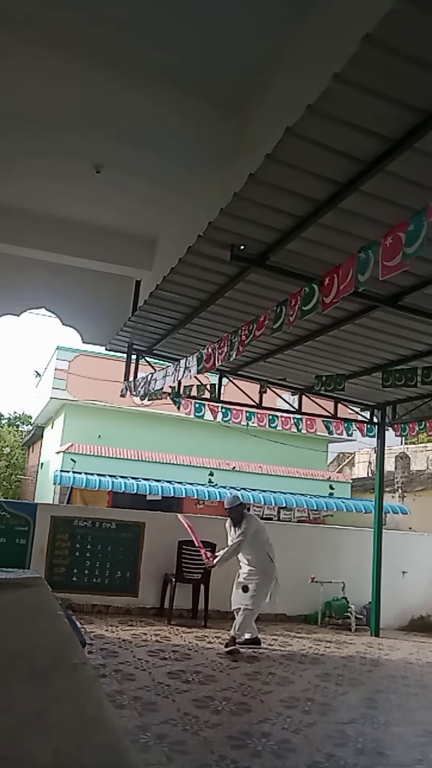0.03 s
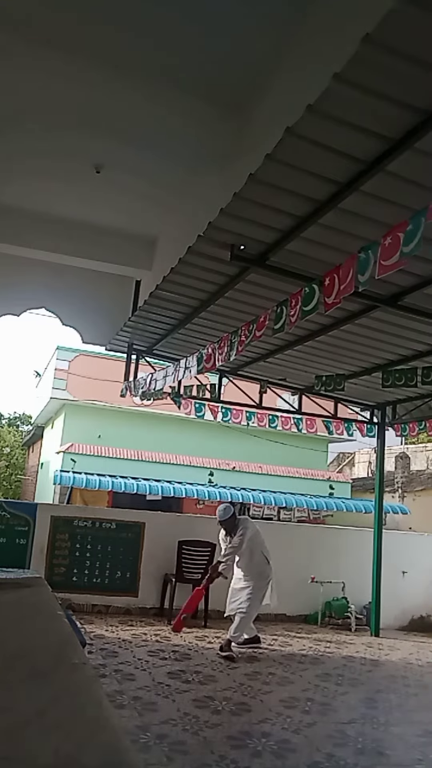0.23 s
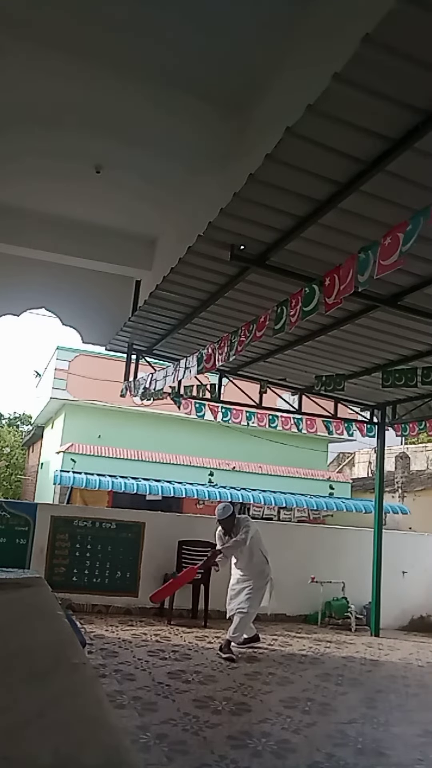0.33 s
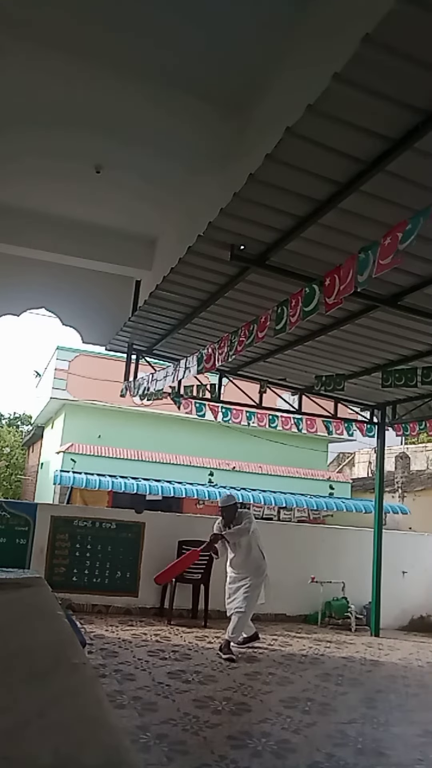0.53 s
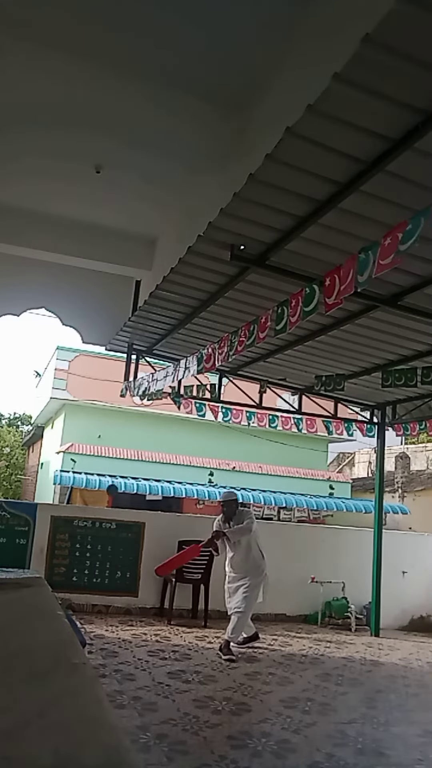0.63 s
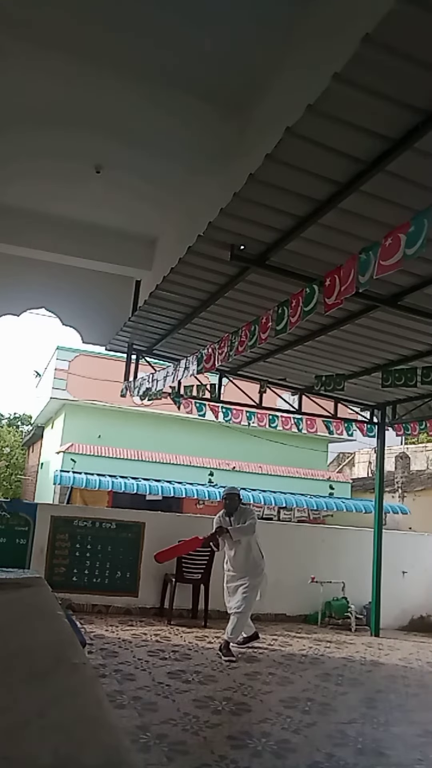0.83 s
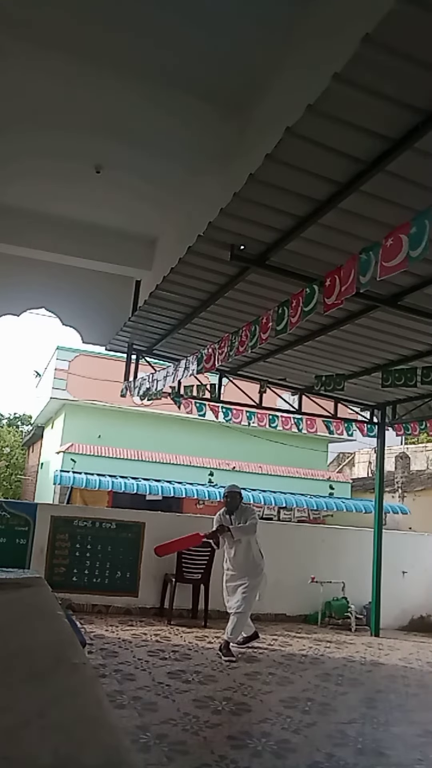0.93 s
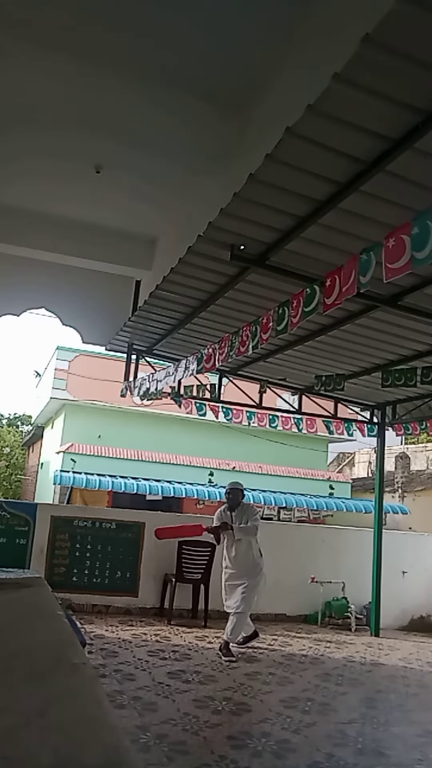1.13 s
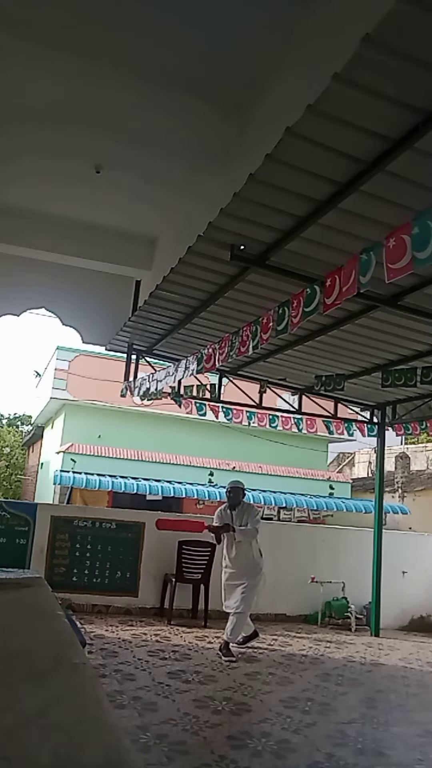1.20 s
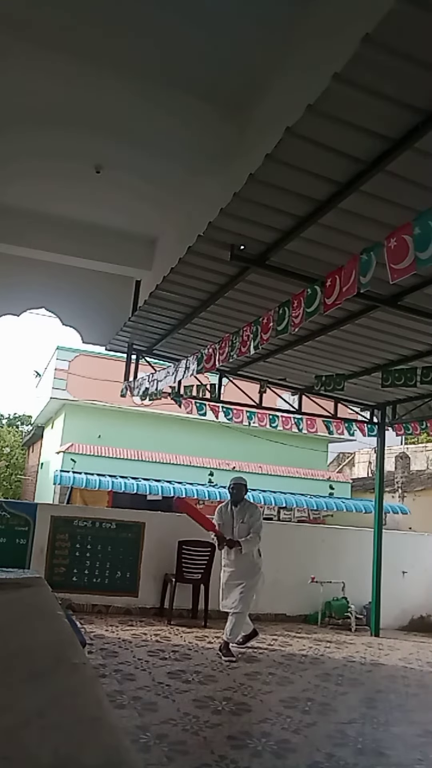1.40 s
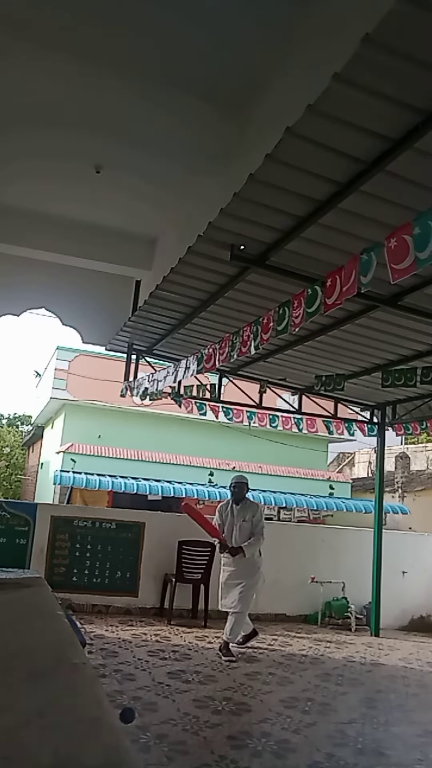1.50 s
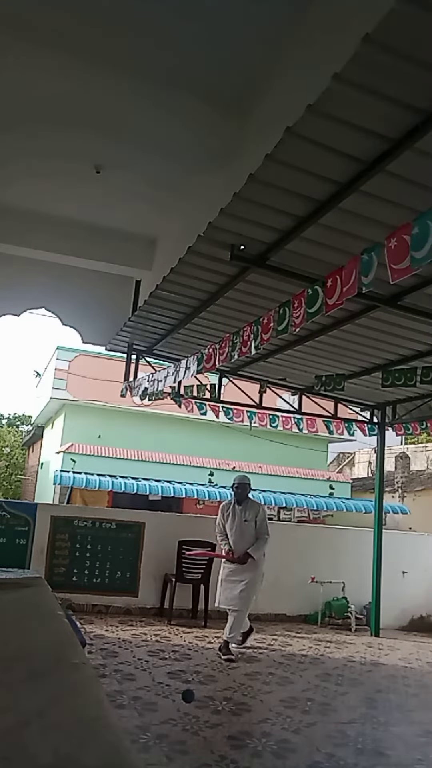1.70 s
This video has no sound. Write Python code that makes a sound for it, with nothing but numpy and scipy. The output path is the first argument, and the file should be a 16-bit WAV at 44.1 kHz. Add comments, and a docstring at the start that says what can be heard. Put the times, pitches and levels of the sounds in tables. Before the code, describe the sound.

A cricket bat hits a hollow ball with one sharp crack that echoes under the roof of a tiled yard. The ball then bounces softly twice, the second time duller, over a faint background rumble.

```python
"""A bat cracks against a hollow ball under the sheet roof of a tiled, walled yard.
Contact and bat ring as damped modes; the crack slaps off floor and walls, thickens into
reverberation and leaves a low ringing tone. The ball then bounces twice, each time a soft pop
and a thud, over a faint rumble, a low hum and a hiss that swells and fades."""
import sys
import numpy as np
from scipy import signal
from scipy.fft import rfft, irfft
from scipy.io import wavfile
from scipy.ndimage import uniform_filter1d

SR = 44100
rng = np.random.default_rng(int(sys.argv[2]) if len(sys.argv) > 2 else 0)


def waveform_to_disk(signal):
    """Save audio, clipped to [-1, 1], as 16-bit WAV at the path in sys.argv[1]."""
    frames = np.transpose(np.atleast_2d(signal))
    scaled = np.clip(frames, -1, 1) * 32767
    samples = np.round(scaled).astype(np.int16)
    wavfile.write(sys.argv[1], SR, samples)


N = 77175
T = np.arange(N) / SR
BIN_HZ = np.arange(N // 2 + 1) * SR / N


def from_db(db):
    """Decibels to gain."""
    return 10 ** (np.asarray(db) / 20)


def at_hz(points, hz):
    """Table lookup on a log-frequency axis."""
    freqs, values = np.transpose(points)
    return np.interp(np.log(np.maximum(hz, 1)), np.log(freqs), values)


def level_curve(points):
    """Gain over time from (time [s], level [dB]) rows."""
    return from_db(np.interp(T, *np.transpose(points)))


def delayed(x, delay_s):
    """Delay, cut to N samples."""
    return np.concatenate([np.zeros(int(delay_s * SR)), x])[:N]


def ring(modes):
    """Damped sines struck at time zero."""
    return sum(from_db(db - 60 * T / t60_s) * np.sin(2 * np.pi * hz * T) for hz, db, t60_s in modes)


def resonance(modes, build_s):
    """Damped sines that build up gradually."""
    return ring(modes) * (1 - np.exp(-T / build_s))


def with_slaps(x, slaps):
    """Direct sound plus distinct reflections."""
    return x + sum(from_db(db) * delayed(x, delay_s) for delay_s, db in slaps)


def noise(spectrum):
    """Steady noise of the given spectral density."""
    white = rfft(rng.standard_normal(N))
    return irfft(white * from_db(at_hz(spectrum, BIN_HZ)), N) * np.sqrt(SR / 2)


# outdoor air spectrum (frequency [Hz], density [dB/Hz])
RUMBLE_SPECTRUM = [(25, -103), (55, -106), (90, -94), (160, -91.5), (280, -94.5), (450, -99), (900, -101),
                   (2000, -108), (4000, -115), (6500, -116), (8500, -127), (15000, -128)]
# rumble envelope (time [s], level [dB])
RUMBLE_ENVELOPE = [(0, -1), (.2, 1), (.7, 3.5), (1.05, -0.5), (1.35, -4), (1.75, 1)]
def rumble():
    """Faint rumble of the yard's still air."""
    return level_curve(RUMBLE_ENVELOPE) * noise(RUMBLE_SPECTRUM)


# hum envelope (time [s], level [dB])
HUM_ENVELOPE = [(0, -18.5), (.4, 1.5), (1.1, 5), (1.45, -2.5), (1.75, -7.5)]
def hum(hz=92.9, base_db=-67.5, waver_db=1.5):
    """Low tone with a randomly wavering level."""
    waver = np.interp(T, np.linspace(0, T[-1], 14), rng.standard_normal(14))
    return level_curve(HUM_ENVELOPE) * from_db(base_db + waver_db * waver) * np.sin(2 * np.pi * hz * T)


# hiss spectrum (frequency [Hz], density [dB/Hz])
HISS_SPECTRUM = [(1000, -125), (2500, -109), (4500, -107), (6300, -100), (7200, -107), (8300, -119),
                 (13500, -119), (15200, -107)]
# hiss envelope (time [s], level [dB])
HISS_ENVELOPE = [(0, -1.5), (.16, -17.5), (.42, -5), (.63, 1.5), (.8, -24), (.93, -5.5), (1.06, -37),
                 (1.2, -2.5), (1.3, 0.5), (1.39, -1.5), (1.45, -11), (1.53, -18), (1.625, 1.5),
                 (1.69, -12.5), (1.75, -38)]
def hiss():
    """Faint treble noise that swells and fades."""
    return level_curve(HISS_ENVELOPE) * noise(HISS_SPECTRUM)


# yard reverberation time (frequency [Hz], T60 [s])
YARD_DECAY = [(90, 0.45), (250, 0.52), (450, 0.6), (1000, 0.53), (3000, .5), (6000, 0.44), (10000, 0.31),
              (15000, 0.22)]
def reverb(spectrum, build_s, hold_s, sag_db_per_s):
    """Dense reflections: each band builds, sags slowly for a moment, then dies away at its own rate."""
    flutter_s, flutter_gain = 0.037, 0.27  # floor-roof round trip
    source = rfft(noise(spectrum)) * (1 + flutter_gain * np.exp(-2j * np.pi * BIN_HZ * flutter_s))
    edges_hz = np.geomspace(22, 18000, 17)
    held_s = np.minimum(T, hold_s)
    tail = np.zeros(N)
    for low, high in zip(edges_hz, edges_hz[1:]):
        band = irfft(source * (BIN_HZ >= low) * (BIN_HZ < high), N)
        window_s = max(3 / (high - low), 0.008)
        power = uniform_filter1d(band ** 2, size=int(window_s * SR), mode="wrap")
        levelled = band * band.std() / np.sqrt(power + 1e-24)
        t60_s = at_hz(YARD_DECAY, np.sqrt(low * high))
        tail += levelled * from_db(-sag_db_per_s * held_s - 60 * (T - held_s) / t60_s)
    return tail * (1 - np.exp(-(T / build_s) ** 2))


# ball's pop at each landing (frequency [Hz], level [dB], T60 [s])
POP_MODES = [(903, -42.5, 0.04), (1240, -51.5, 0.045), (1630, -47.5, 0.015)]
# pop reflections (delay [s], level [dB])
POP_SLAPS = [(.0128, 3), (.0218, 3), (.0352, 1.5)]
# hollow ball modes and low floor knock (frequency [Hz], level [dB], T60 [s])
BALL_FLOOR_MODES = [(233, -48, 0.23), (712, -52.5, 0.48), (892.4, -46, 0.23), (973, -49, 0.16),
                    (1540, -67, 0.17)]
# pop reverberation (frequency [Hz], density [dB/Hz])
POP_REVERB = [(300, -95), (520, -86.5), (690, -77), (970, -72.5), (1130, -84.5), (1800, -84), (3000, -93.5),
              (6200, -99), (8500, -114), (15000, -116)]
# floor thud reverberation (frequency [Hz], density [dB/Hz])
THUD_REVERB = [(40, -96), (100, -73), (160, -71.5), (240, -72), (330, -79), (500, -97.5), (1500, -130)]
def bounce(thud_db, cutoff_hz, linger_hz, linger_db):
    """Hollow pop and low thud on the tiles; one tone lingers under the roof."""
    pop = with_slaps(ring(POP_MODES), POP_SLAPS)
    body = resonance(BALL_FLOOR_MODES, build_s=0.008)
    linger = resonance([(linger_hz, linger_db, 0.37)], build_s=0.041)
    shape = dict(build_s=0.004, hold_s=0.024, sag_db_per_s=62)
    tail = reverb(POP_REVERB, **shape)
    thud = from_db(thud_db) * reverb(THUD_REVERB, **shape)
    lowpass = signal.butter(2, cutoff_hz, fs=SR, output="sos")
    return signal.sosfilt(lowpass, pop + body + linger + tail + thud)


# ball landings (time [s], level [dB], thud [dB], cutoff [Hz], lingering tone [Hz], tone level [dB])
LANDINGS = [(1.07, 0, -0.5, 5600, 834, -43), (1.3635, -7.5, -2, 3850, 835, -40.5)]
def ball_bounces():
    """Two landings, the second softer and duller."""
    return sum(from_db(db) * delayed(bounce(*timbre), time_s) for time_s, db, *timbre in LANDINGS)


# swells of the low tone after the stroke (delay [s], level [dB])
TONE_SWELLS = [(.043, -21), (.080, -20), (0.154, -30.5), (.199, -28.5), (.236, -36.5), (.266, -31.5),
               (0.286, -40), (.348, -43.5)]
def low_tone_swells(hz=432.3, swell_s=0.037):
    """The low ringing tone pulses in rounded swells as it fades."""
    window = np.sin(np.pi * np.minimum(T / swell_s, 1)) ** 2
    swell = window * np.sin(2 * np.pi * hz * T)
    return sum(from_db(db) * delayed(swell, delay_s) for delay_s, db in TONE_SWELLS)


# bat's own modes (frequency [Hz], level [dB], T60 [s])
BAT_BODY_MODES = [(299, -31, 0.019), (444, -20.5, .05), (746, -31.5, .03), (1240, -31.5, 0.0095),
                  (1622, -14, .015)]
# heavily damped contact (frequency [Hz], level [dB], T60 [s])
CONTACT_MODES = [(1525, -5, 0.0034), (3150, -14, 0.0013), (6000, -32, 0.0013), (15000, -24.5, .001)]
# first reflections (delay [s], level [dB])
CRACK_SLAPS = [(.0046, -9.5), (.0087, -2.5), (0.0129, -5.5), (0.0148, -2.5), (0.0182, -3), (0.0233, 1.5),
               (0.0355, -1)]
# tones left ringing in the yard (frequency [Hz], level [dB], T60 [s])
YARD_TONES = [(97.6, -42, 0.91), (145, -37, 0.72), (233, -27.5, 0.64), (298.8, -26, 0.53),
              (434.5, -31, 0.81), (443.5, -24, 0.53), (526, -41.5, 0.83), (584.7, -30.5, 0.68),
              (643, -35.5, 0.74), (798, -31, 0.56), (983, -35.5, 0.32), (1335, -29.5, 0.53),
              (1367, -27, .33), (1537, -32.5, 0.37), (4006, -35.5, 0.33)]
# crack reverberation (frequency [Hz], density [dB/Hz])
CRACK_REVERB = [(30, -67), (65, -73), (110, -58.5), (200, -55), (330, -46), (520, -49), (700, -58),
                (1000, -55.5), (1550, -57.5), (2600, -64), (4500, -69.5), (6200, -66), (7300, -77),
                (8500, -84.5), (13000, -87.5), (15200, -86)]
def bat_stroke():
    """Contact crack and short bat ring, followed by the yard's reflections and tones."""
    crack = ring(BAT_BODY_MODES) - ring(CONTACT_MODES)
    tones = resonance(YARD_TONES, build_s=0.011)
    tail = reverb(CRACK_REVERB, build_s=0.002, hold_s=0.071, sag_db_per_s=58.5)
    return with_slaps(crack, CRACK_SLAPS) + tones + low_tone_swells() + tail


def scene():
    """One stroke and two bounces over the background, mono."""
    stroke = delayed(bat_stroke(), delay_s=0.2114)
    background = hum() + rumble() + hiss()
    return (stroke + background + ball_bounces())[None]


def record(dry, ceiling=0.61, low_cut_hz=75, high_cut_hz=15600):
    """Soft clip, then cut deep bass and top treble."""
    clipped = ceiling * np.tanh(dry / ceiling)
    highpass = signal.butter(2, low_cut_hz, "high", fs=SR, output="sos")
    lowpass = signal.ellip(10, 0.2, 70, high_cut_hz, fs=SR, output="sos")
    return signal.sosfilt(lowpass, signal.sosfilt(highpass, clipped))


dry = scene()
out = record(dry)
waveform_to_disk(out)
```